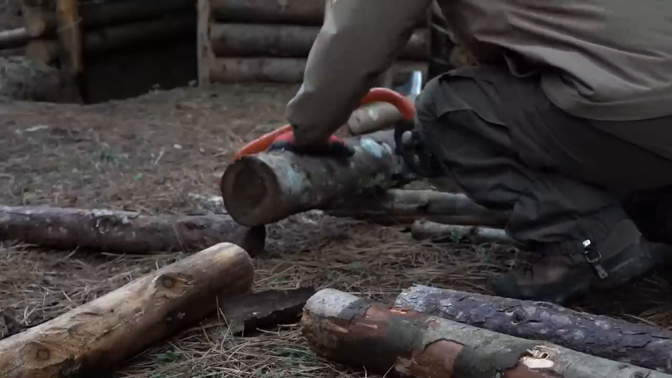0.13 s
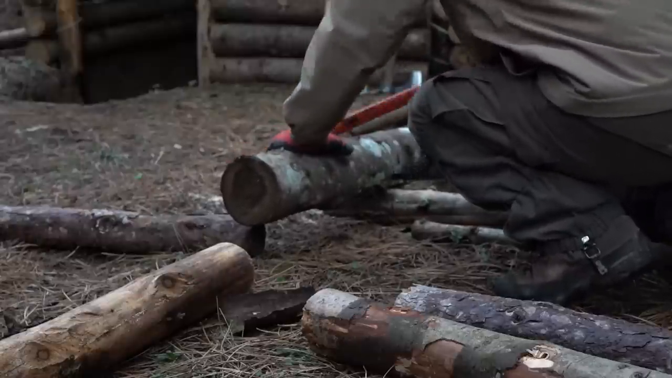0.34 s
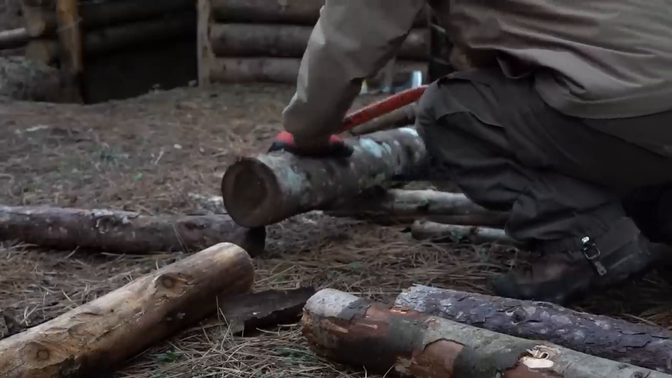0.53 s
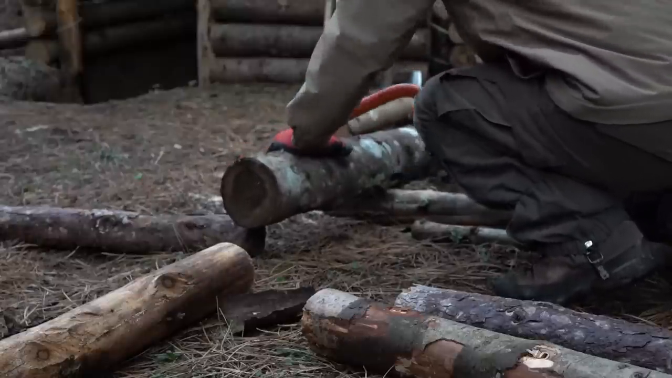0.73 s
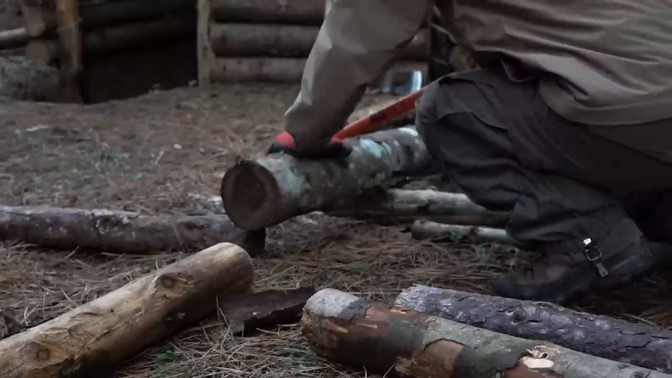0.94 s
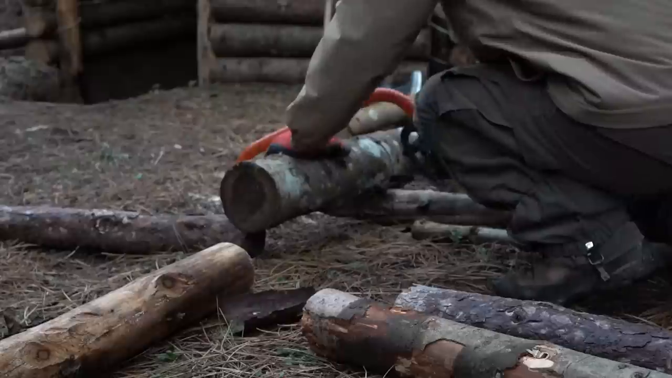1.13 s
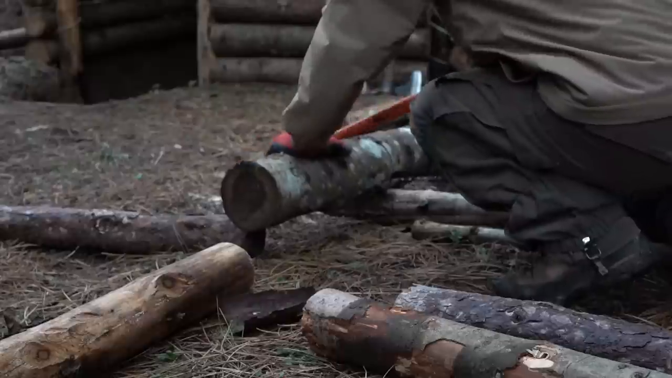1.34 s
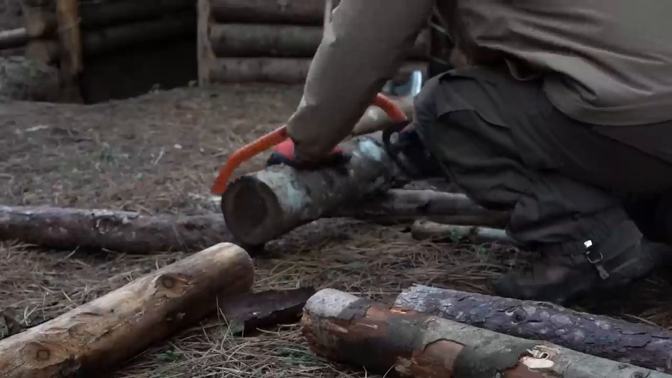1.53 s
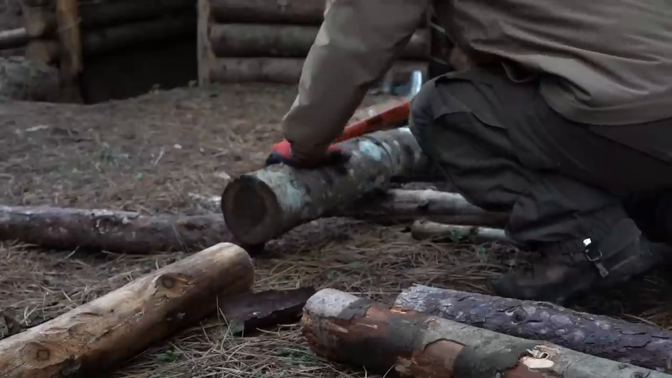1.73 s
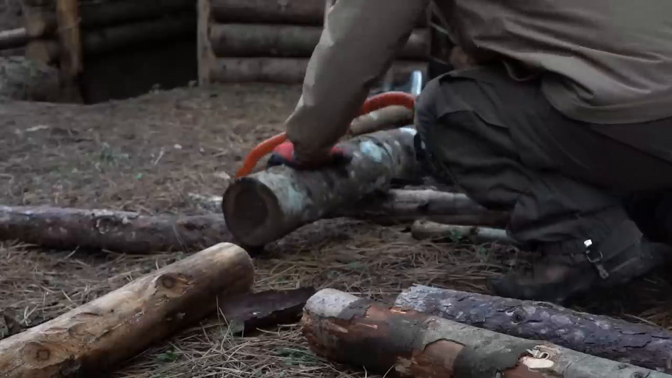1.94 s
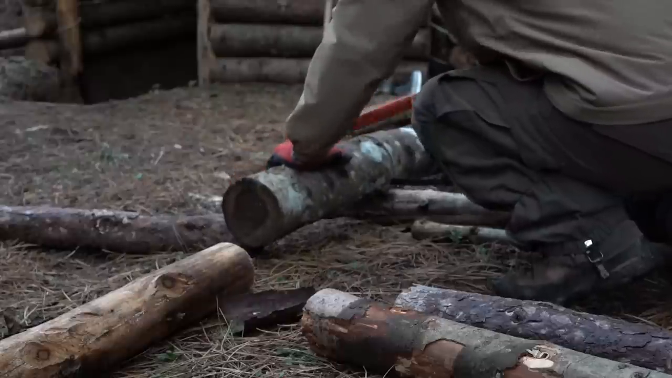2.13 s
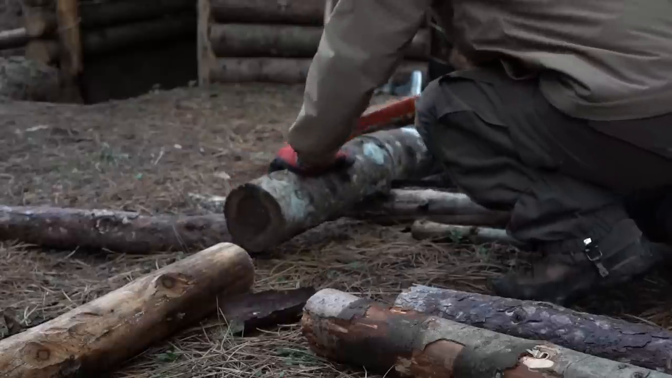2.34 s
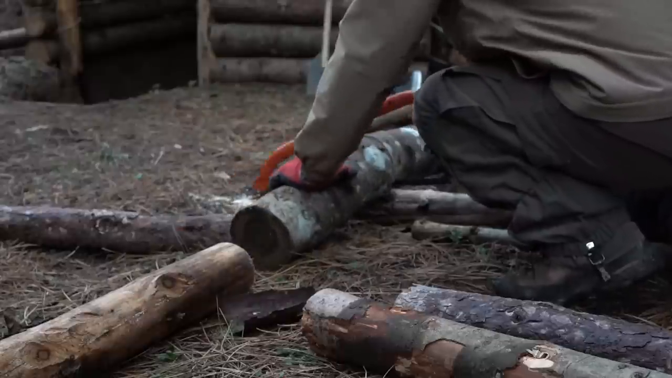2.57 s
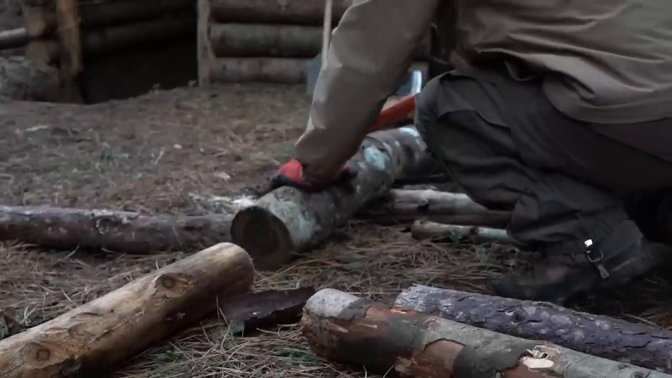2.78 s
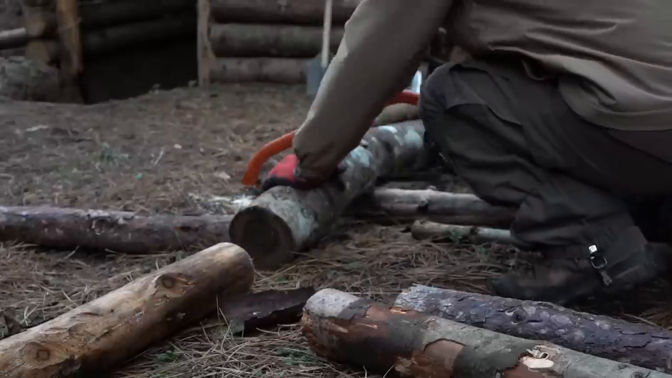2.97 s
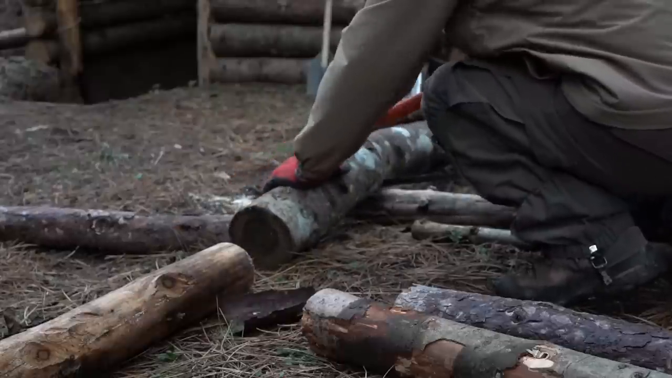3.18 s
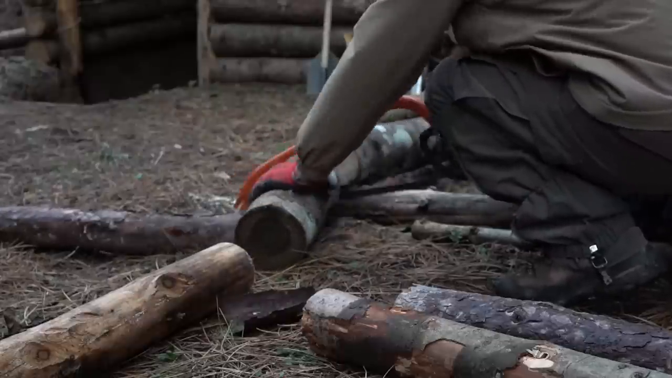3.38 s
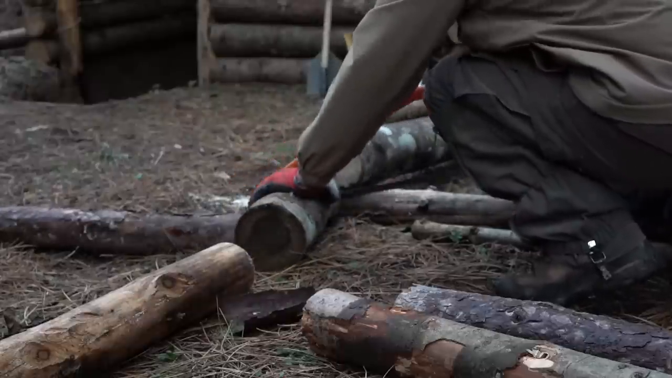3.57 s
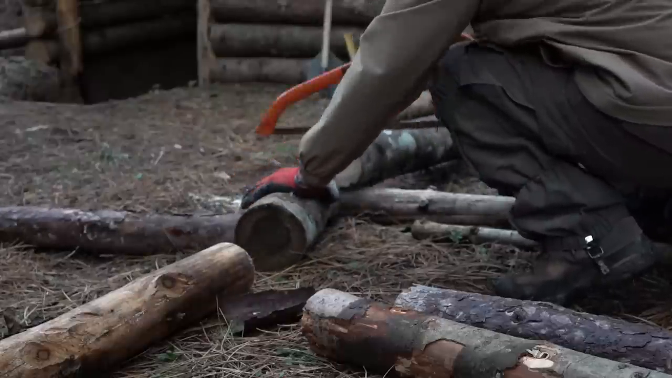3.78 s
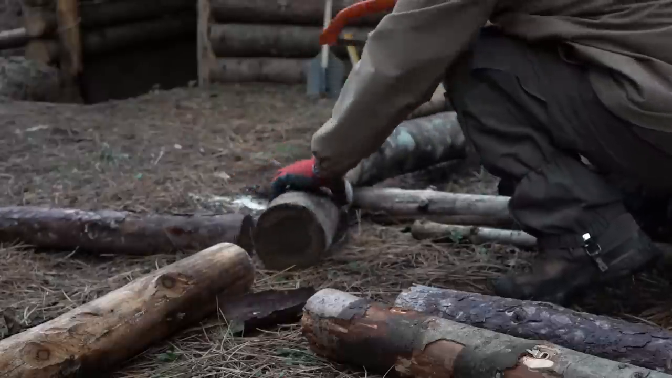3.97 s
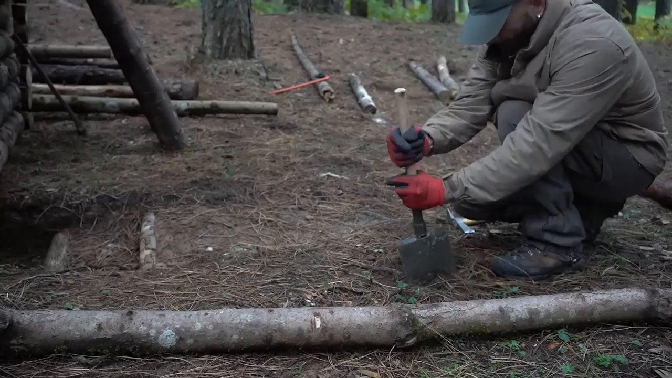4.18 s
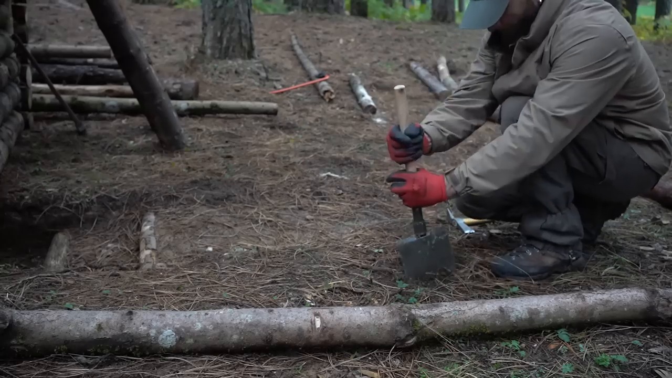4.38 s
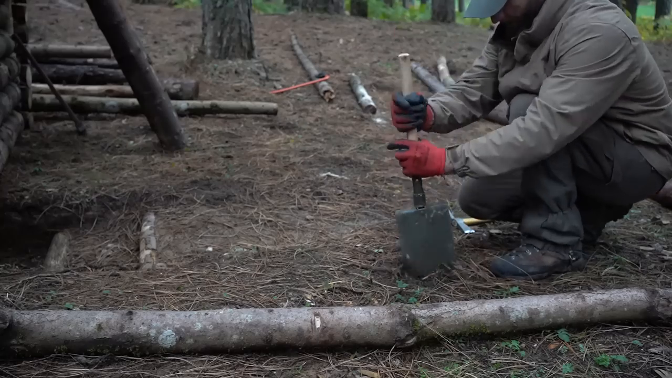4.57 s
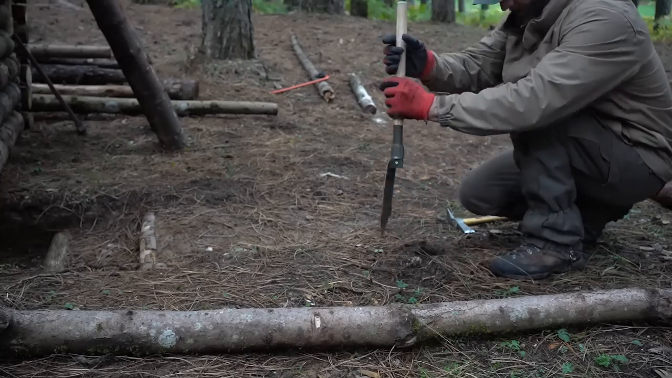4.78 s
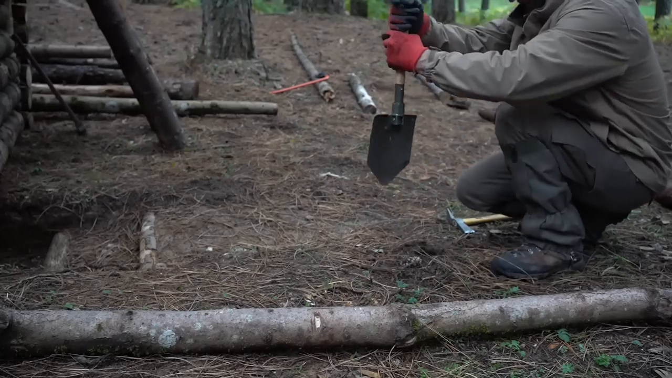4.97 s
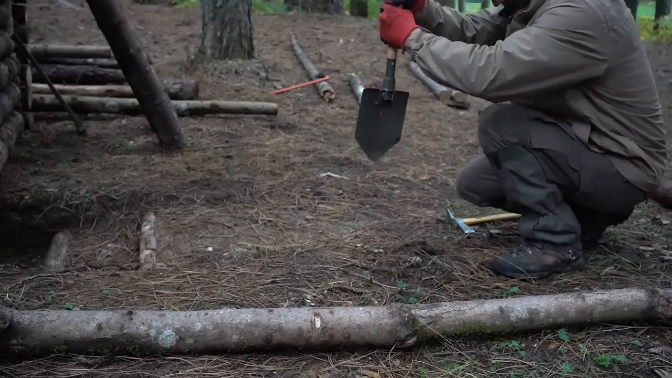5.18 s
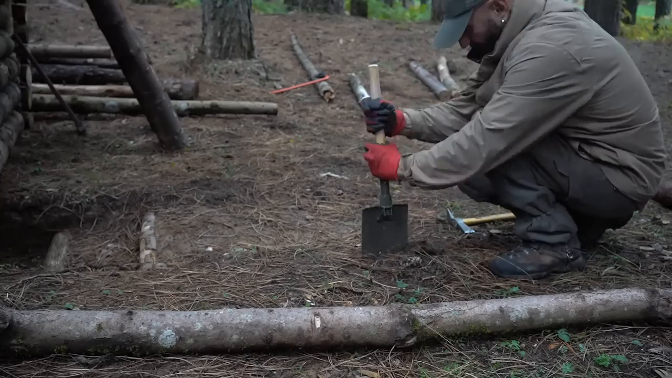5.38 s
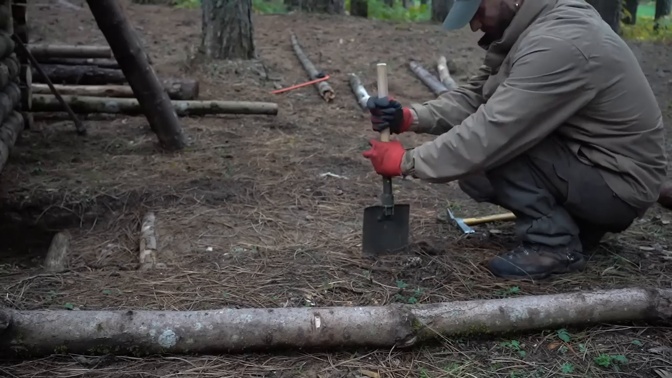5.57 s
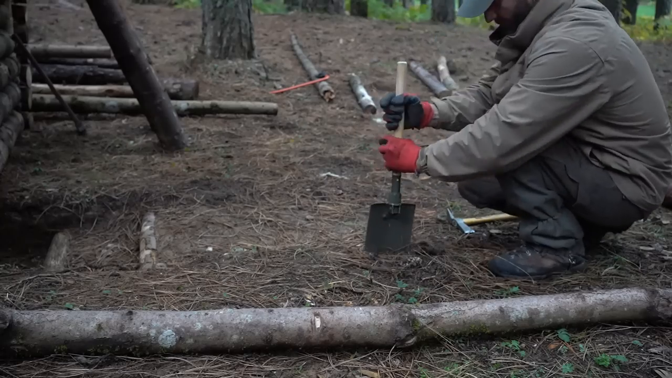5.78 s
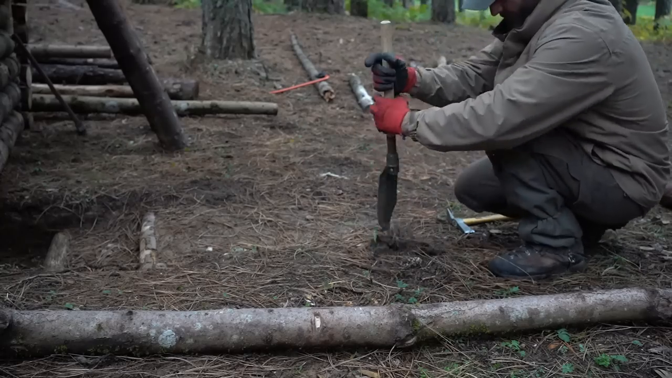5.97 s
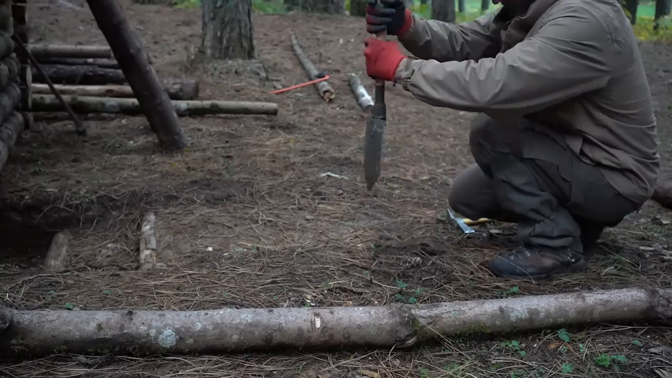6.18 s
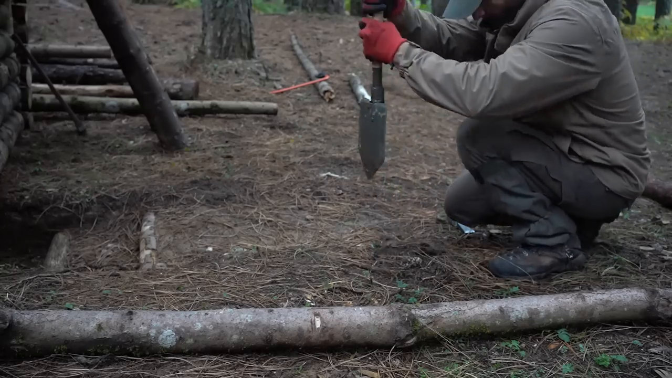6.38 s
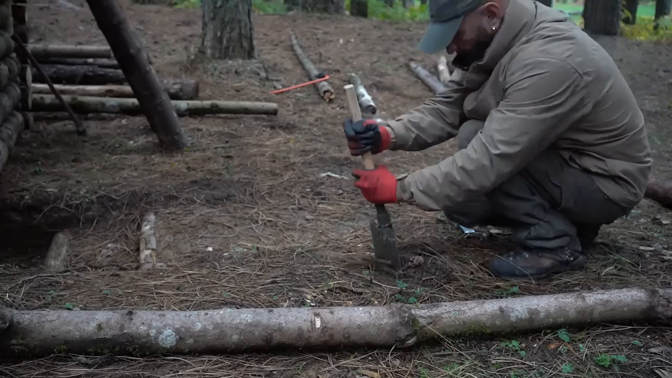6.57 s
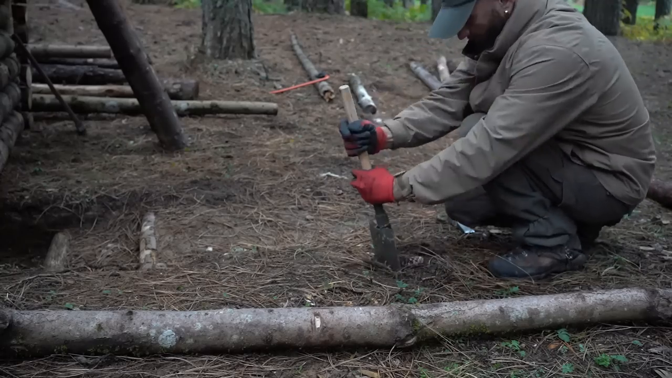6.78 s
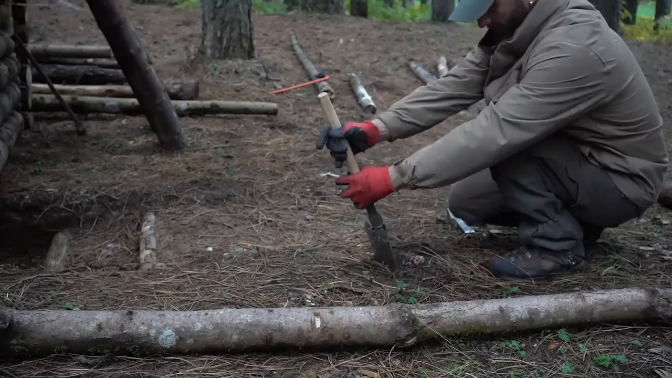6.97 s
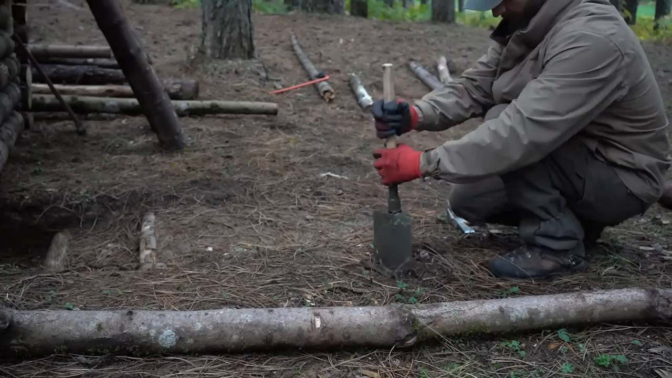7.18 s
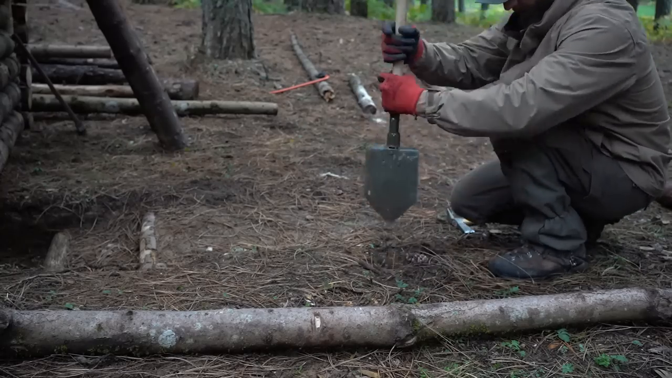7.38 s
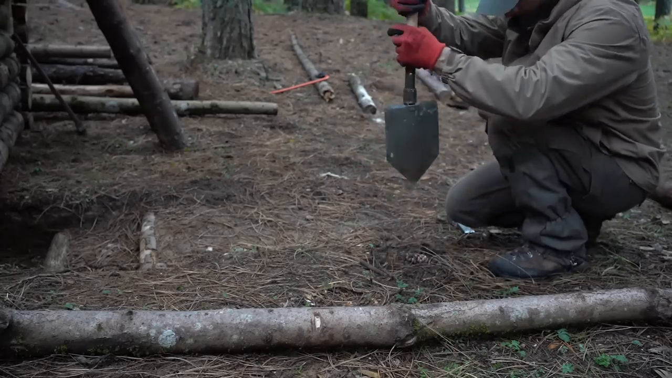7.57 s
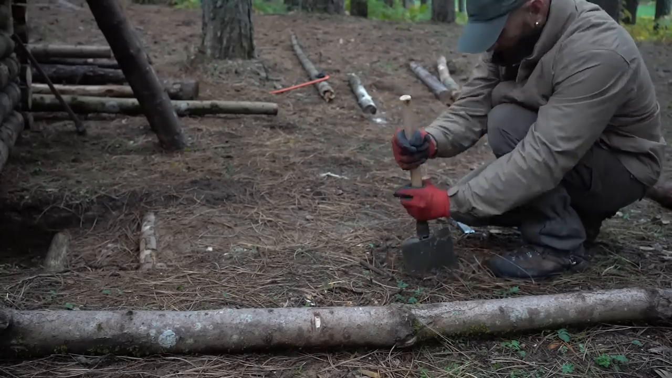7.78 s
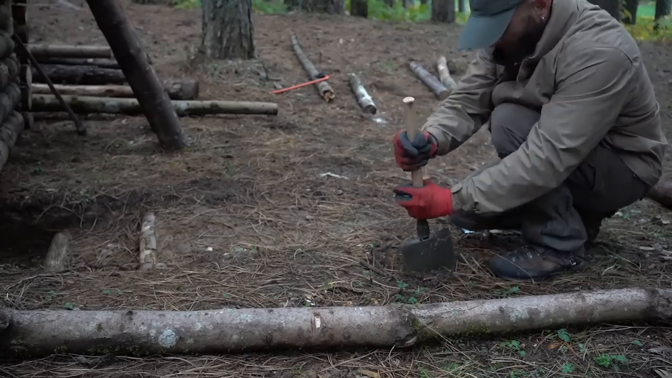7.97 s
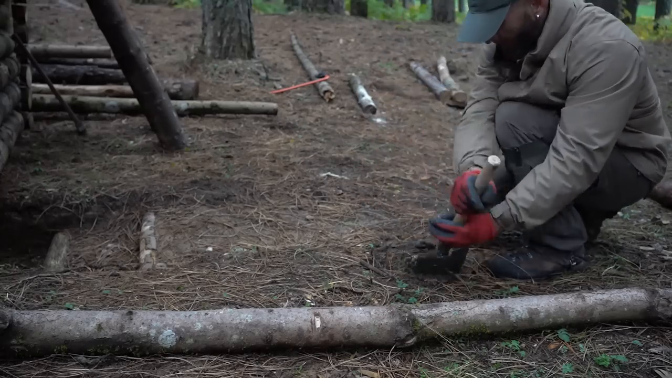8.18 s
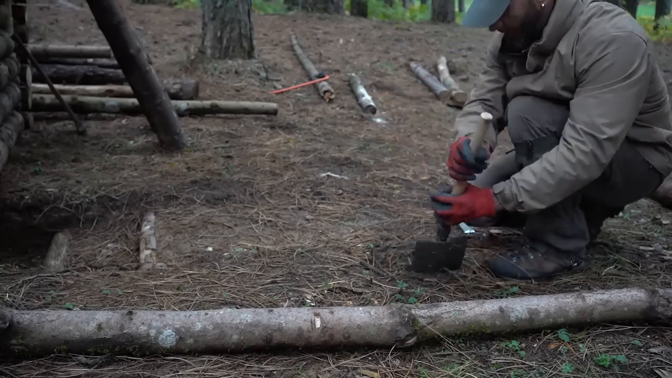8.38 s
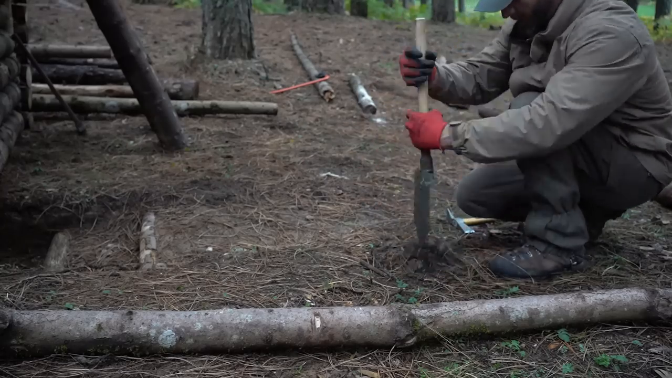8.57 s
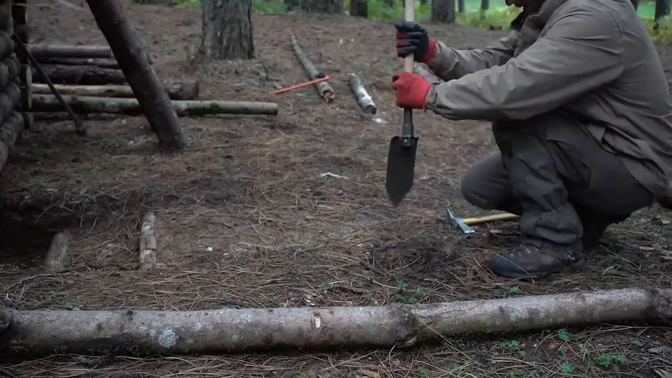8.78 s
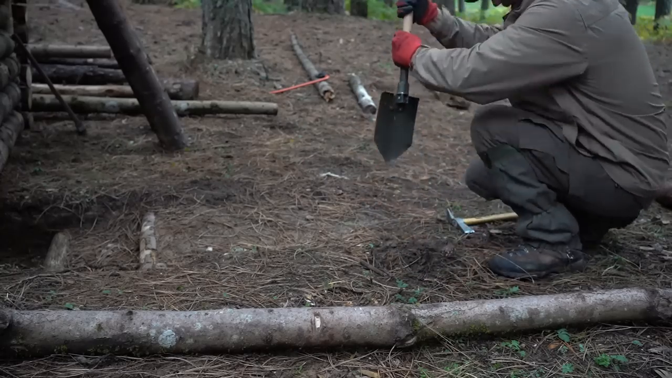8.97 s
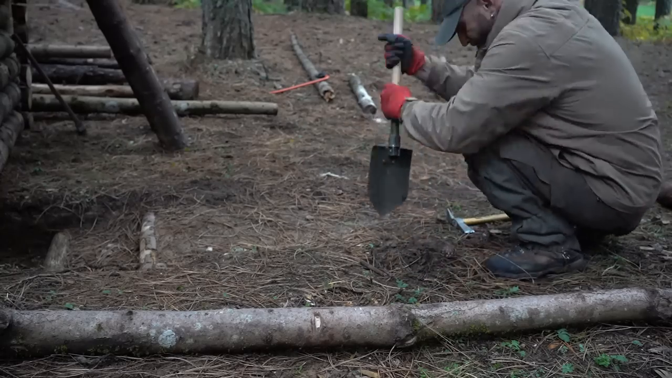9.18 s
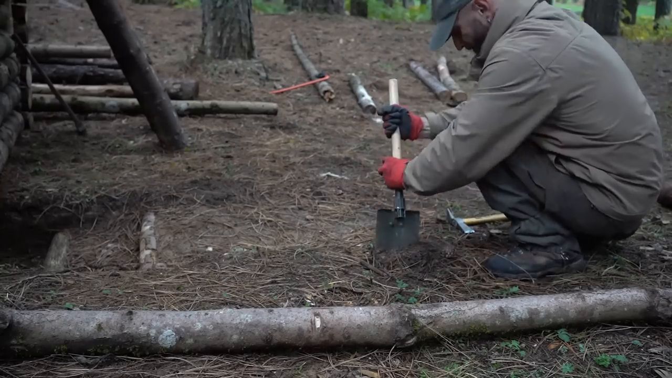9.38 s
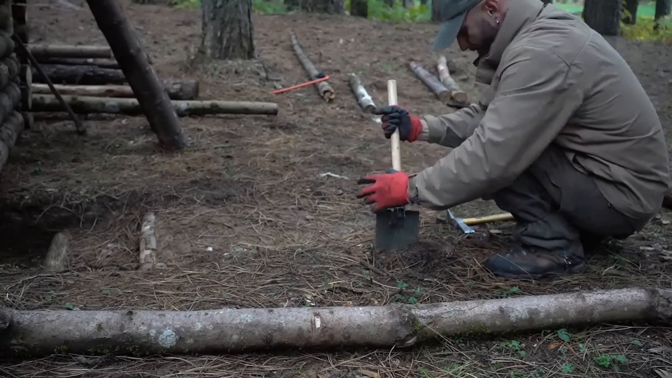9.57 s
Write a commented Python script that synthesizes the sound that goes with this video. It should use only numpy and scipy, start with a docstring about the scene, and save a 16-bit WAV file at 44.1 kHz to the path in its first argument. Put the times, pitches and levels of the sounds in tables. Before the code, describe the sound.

A hand saw rasps quickly through a log until it snaps, then a small shovel stabs five times into forest soil.

```python
"""A bow saw rasps through a log in quick push-and-pull strokes, its teeth tearing fibres that set blade
and wood ringing. The log knocks on its support, the last fibres snap and the blade clinks free.
Then a short steel shovel is stabbed five times into root-filled forest soil, levered and drawn out
ringing between stabs. A jacket flaps with the swings, the soft ground booms, and the trees return
a thin echo over quiet air."""
import sys
import numpy as np
from scipy import signal
from scipy.io import wavfile
from scipy.ndimage import uniform_filter1d

SR = 44100
rng = np.random.default_rng(int(sys.argv[2]) if len(sys.argv) > 2 else 0)


def pcm_store(signal):
    """Save signal as 16-bit PCM."""
    levels = np.round(np.clip(np.atleast_2d(signal), -1, 1) * 32767)
    wavfile.write(sys.argv[1], SR, levels.astype(np.int16).T)


N = 424241
TIME = np.arange(N) / SR
AGE = TIME[:SR * 3 // 4]  # seconds since a hit
LET_GO_S = .011  # release of a saw stroke

# saw strokes, push and pull in turn: t/s, length/s, rasp/dB, crunch/dB, hum/dB, groan/Hz, catch/dB
SAW_STROKES = [(0.005, 0.073, -40, -38.5, -41, 360, -45), (0.0987, 0.14, -18.5, -25.5, -24.5, 339, -13),
               (0.3346, .13, -27, -32, -28.5, 353, -20), (0.568, 0.1, -18, -26, -23, 302, -9),
               (0.803, 0.13, -31, -37, -36.5, 375, -34), (1.0287, 0.11, -21.5, -29, -27, 351, -11),
               (1.25, .13, -31, -36.5, -32.5, 358, -38), (1.468, 0.15, -19, -28.5, -25, 359, -12.5),
               (1.693, .13, -24, -30, -25.5, 300, -16), (1.9168, .13, -18.5, -27, -25, 357, -10.5),
               (2.149, .125, -25.5, -32.5, -31.5, 348.4, -36), (2.35, 0.17, -18.5, -25, -28, 392, -29),
               (2.583, 0.13, -23, -29, -34, 290, -22), (2.81, 0.094, -16.5, -26.5, -32.5, 250, -25),
               (3.064, 0.1, -25, -34.5, -44, 237, -24), (3.262, 0.017, -30.5, -40, -37, 236, -36)]
# spectrum of the rasping teeth: f/Hz, level/dB
RASP_EQ = [(1200, -27.5), (2300, -3.5), (3200, 9), (4500, 11), (6000, 0.5), (8300, 4.5), (9300, -1.5),
           (10500, -9), (12500, 0), (15300, 2.5), (16500, 5)]
# modes of the log: f/Hz, level/dB, t60/s
LOG_MODES = [(98, -21, 0.1), (174, -8.5, 0.087), (221, -10, 0.27), (294, -0.5, 0.081), (354.3, -1, 0.096),
             (419, -2.5, 0.027), (529.4, -5, 0.071), (631, -12.5, 0.12)]
# spectrum of a sharp snap: f/Hz, level/dB
SNAP_EQ = [(150, -7), (400, -7.5), (1500, -4), (4000, 0.5), (8000, -2), (10500, -22), (15000, -5.5)]
# modes of the free saw blade: f/Hz, level/dB, t60/s
BLADE_MODES = [(2326, -11, 0.19), (3230, -11.5, .12), (3720, -9.5, 0.51), (4560, -12, 0.2),
               (4690, -5, 0.36), (4770, -5, 0.28), (4920, -3, 0.35), (5240, 1, 0.13), (6640, -23, 0.11),
               (8100, -9, .17), (12400, -9, .1), (14300, -7, .1), (15200, -9, .06)]
# spectrum of crumbling soil: f/Hz, level/dB
SOIL_EQ = [(700, -8), (1500, 2), (2500, 0.5), (4500, -1.5), (8200, -2.5), (10000, -19), (15000, -13.5)]
# spectrum of the jacket cloth: f/Hz, level/dB
CLOTH_EQ = [(100, -4.5), (300, -2), (550, -2.5), (880, 3), (1150, -4), (1600, -13), (2500, -23.5),
            (6000, -41)]
# shovel stabs: t/s, grit/dB, grit hold/s, roots/dB, roots hold/s, thud/dB, ring/Hz, ring/dB,
# ground boom/dB, sleeve swish/dB
SHOVEL_STABS = [(4.213, -12.5, 0.0074, -12, 0.015, -10, 1692, -21.5, -21.5, -35),
                (5.4298, -12.5, 0.0053, -9, 0.007, -13, 1660, -39, -24.5, -39),
                (6.564, -10.5, 0.016, -11.5, 0.012, -11.5, 966, -17, -24.5, -34.5),
                (7.8215, -20, 0.018, -14, 0.0022, -6, 445, -15, -19.5, -33.5),
                (9.2768, -13.5, 0.0011, -15, 0.024, -16, 1134, -14, -28.5, -33.5)]
# modes of the free shovel: f/Hz, level/dB, t60/s
SHOVEL_MODES = [(917, -7, 0.19), (1500, -13, 0.48), (1580, -8, .14), (1690, -9.5, 0.41), (2060, 0, .1),
                (2516, -10, 0.18), (3200, -11.5, 0.1), (3354, 1.5, .1), (4066, -5, 0.13), (4620, 4.5, 0.08),
                (5450, 4, 0.074), (6220, -12, 0.055), (6740, 0, 0.15), (7420, 1.5, 0.13),
                (8140, 9.5, 0.086), (12000, 2.5, 0.06)]


def gain_of(db):
    """Decibels to gain."""
    return 10 ** (np.asarray(db) / 20)


def evened(x):
    """Scales to rms 1."""
    return x / np.sqrt(np.mean(x ** 2) + 1e-20)


def peaked(x, size=130):
    """Scales the loudest stretch of `size` samples to rms 1."""
    return x / np.sqrt(uniform_filter1d(x ** 2, size).max() + 1e-20)


def read(points, hz):
    """Reads a table on a log-frequency axis."""
    f, value = np.transpose(points)
    return np.interp(np.log(hz + 1), np.log(f + 1), value)


def add(mix, s, sound):
    """Mixes a sound in at time s."""
    part = mix[max(round(s * SR), 0):][:len(sound)]
    part += sound[:len(part)]


def through(x, response):
    """Passes x through an impulse response."""
    return signal.oaconvolve(x, response)[:len(x)]


def colour(x, spectrum, size=4096):
    """Minimum-phase EQ of unit energy."""
    log_gain = np.log(gain_of(read(spectrum, abs(np.fft.fftfreq(size, 1 / SR)))))
    taps = np.fft.ifft(np.exp(signal.hilbert(log_gain).conj())).real[:size // 2]
    return through(x, taps / np.linalg.norm(taps))


def ring(modes):
    """Unit-energy impulse response of damped modes."""
    out = sum(gain_of(db - 60 * AGE / t60) * np.sin(2 * np.pi * hz * AGE + k * k)
              for k, (hz, db, t60) in enumerate(modes))
    return out / np.linalg.norm(out)


def struck(modes, damping=1):
    """Each point of contact favours other modes; damping shortens their ring."""
    return ring([(hz, db + 1.5 * rng.standard_normal(), t60 / damping) for hz, db, t60 in modes])


def body(peaks):
    """Impulse response of broad resonances."""
    return ring([(hz, db + 10 * np.log10(width), np.log(1000) / np.pi / width)
                 for hz, width, db in peaks])


def resonate(x, hz, width_hz):
    """A resonance of gain 1 that follows the curve hz."""
    turn = np.exp(2j * np.pi * np.cumsum(hz) / SR)
    radius = np.exp(-np.pi * width_hz / SR)
    return 2 * (turn * signal.lfilter([1 - radius], [1, -radius], x / turn)).real


def tone(hz, t60):
    """One struck, decaying resonance."""
    attack = 1 - np.exp(-AGE / 0.00015)
    return np.sqrt(2) * np.sin(2 * np.pi * hz * AGE) * gain_of(-60 * AGE / t60) * attack


def wander(hz):
    """Random drift of rms 1, low-passed at hz."""
    return evened(signal.sosfilt(signal.butter(2, hz, fs=SR, output="sos"), rng.standard_normal(N)))


def grains(samples, per_s, spread_db):
    """A random train of small clicks, a few of them large."""
    size = gain_of(spread_db * np.minimum(rng.exponential(1, samples), 4))
    return evened(size * rng.standard_normal(samples) * (rng.random(samples) < per_s / SR))


def burst(rise, hold, fall, linger_db=-60, linger=0.022):
    """A shower of tiny fractures that swells, holds, collapses and lingers; times in seconds."""
    late = np.maximum(AGE - hold, 0)
    decay = np.exp(-late / fall) + gain_of(linger_db) * np.exp(-late / linger)
    return np.minimum(AGE / rise, 1) * decay * grains(len(AGE), 20000, 3.53)


def swell(s, length, rise, fall, arch_db=0, skew=1):
    """Envelope of one movement: a rise up to time s, an arched hold, a release."""
    t = TIME[::16]
    along = np.clip((t - s) / length, 0, 1) ** skew
    outside = np.maximum(s - t, 0) / rise + np.maximum(t - s - length, 0) / fall
    arch = gain_of(-arch_db * (2 * along - 1) ** 2)
    return np.interp(TIME, t, np.exp(-np.minimum(outside, 20)) * arch)


def movements(rows, **shape):
    """One envelope per level column of rows (t/s, length/s, level/dB, ...)."""
    power = sum(gain_of(levels)[:, None] ** 2 * swell(s, length, **shape) ** 2
                for s, length, *levels in rows)
    return np.sqrt(power)


def in_cut(end_s=3.2):
    """Gate that stays open until the teeth leave the wood."""
    return np.exp(-np.clip((TIME - end_s) / LET_GO_S, 0, 20))


def forest_air():
    """A steady, dark bed of air."""
    # spectrum of the air: f/Hz, level/dB
    air_eq = [(20, -2), (45, -1), (100, -4.5), (220, -5), (480, -11), (950, -11), (2500, -17.5),
              (7700, -22.5), (10000, -29), (13500, -25.5), (15800, -31)]
    return colour(rng.standard_normal(N), air_eq)


def steel_rasp(tearing, speed):
    """The teeth set the blade ringing in the cut; a slow blade sounds duller."""
    # resonances of the blade held in the cut: f/Hz, width/Hz, level/dB
    kerf_peaks = [(3310, 480, -17), (3860, 23, -4.5), (4430, 26, -0.5), (4795, 51, 0), (5190, 110, 2.5),
                  (5840, 42, -11.5), (6610, 72, 3), (7170, 65, 5), (8010, 98, -1)]
    # the free length of the blade changes as it travels, so its bending resonances slide
    flex = sum(resonate(tearing, hz * np.exp(.1 * wander(7)), 300) for hz in (3700, 4900, 7400))
    held = through(tearing, body(kerf_peaks))
    bending = evened(colour(flex, RASP_EQ))
    steel = evened(colour(tearing, RASP_EQ) + gain_of(-3.5) * held + gain_of(-6) * bending)
    dull = signal.sosfiltfilt(signal.butter(2, 7000, fs=SR, output="sos"), steel)
    return dull + 1.36 * speed * (steel - dull)


def fibre_crunch(tearing, note_hz=895.4, sag_hz_per_s=17.6):
    """Tearing fibres excite the trunk, one note of which sinks as the cut deepens."""
    # spectrum of tearing fibres: f/Hz, level/dB
    fibre_eq = [(300, -7.5), (650, -8), (1250, 3), (1700, 4), (2600, -4), (3400, -20.5), (7000, -33)]
    # upper resonances of the trunk: f/Hz, width/Hz, level/dB
    trunk_peaks = [(1148, 33, 2.5), (1620, 144, 15.5), (1824, 240, 0), (2395, 25, 7)]
    note = evened(resonate(tearing, note_hz - sag_hz_per_s * TIME, 19))
    return evened(colour(tearing, fibre_eq) + through(tearing, body(trunk_peaks)) + gain_of(-9) * note)


def log_hum(tearing, groan_width_hz=55):
    """The log hums, and teeth passing the fibres groan at a pitch that arches over each stroke."""
    hum_eq = [(100, -12), (210, -3.5), (320, 3), (620, 4), (1500, -11.5), (4000, -42)]
    wood = evened(colour(through(tearing, ring(LOG_MODES)), hum_eq))
    arch = [(s + u * length, hz * (1 - 0.32 * (u - .5) ** 2))
            for s, length, *_, hz, _ in SAW_STROKES for u in np.linspace(0, 1, 5)]
    groan_hz = np.interp(TIME, *np.transpose(arch))
    groan = evened(resonate(resonate(tearing, groan_hz, groan_width_hz), groan_hz, groan_width_hz))
    return evened(wood + gain_of(-1) * groan)


def sawing(top_tooth_hz=420, chatter_db=2.33):
    """Teeth catch and tear fibres, fastest and loudest just past the middle of each stroke."""
    # floor while the blade turns round in the cut: rasp/dB, crunch/dB, hum/dB
    turn_db = (-54, -52, -46)
    strokes = [row[:5] for row in SAW_STROKES]
    biting = movements(strokes, rise=.008, fall=LET_GO_S, arch_db=5.5, skew=1.2)
    # the blade keeps rubbing lightly as it slows down and starts again
    coasting = movements(strokes, rise=.022, fall=.022, arch_db=5.5, skew=1.2)
    rasp, crunch, hum = biting + gain_of(-14) * coasting + gain_of(turn_db)[:, None] * in_cut()
    speed = uniform_filter1d(rasp / rasp.max(), size=2000).clip(1e-4) ** .25
    teeth = 1 + 0.13 * np.cos(2 * np.pi * np.cumsum(top_tooth_hz * speed) / SR)
    tearing = evened(grains(N, 16000, 2.4) * teeth * gain_of(chatter_db * wander(120) + wander(25)))
    out = (gain_of(-1.9) * rasp * steel_rasp(tearing, speed)
           + gain_of(-2.5) * crunch * fibre_crunch(tearing)
           + gain_of(-3) * hum * log_hum(tearing))
    catch_eq = [(1000, -17), (2800, -13), (4000, 0.5), (6000, -2.5), (8000, 1.5),
                (10500, -17), (15000, -9.5)]
    for s, *_, db in SAW_STROKES:
        catch = colour(burst(0.0026, .011, 0.0035), catch_eq)
        add(out, s - .001, gain_of(db - 3) * peaked(catch))
    return out


def wood_knock(response):
    """A blunt blow of about a millisecond rings the wood."""
    blow = np.exp(-AGE / 0.00053) * (1 - np.exp(-AGE / 0.0006))
    return peaked(through(blow, response))


def rocking_log():
    """The log knocks on its support; the ground trembles under the saw and after each knock."""
    # knocks of the log: t/s, knock/dB, ground shake/dB
    knocks = [(.243, -28, -34.5), (0.451, -12.5, -39), (.904, -18, -48), (1.614, -31, -36.5),
              (1.812, -20.5, -39), (1.960, -27.5, -66), (2.277, -26, -58), (2.404, -24, -52),
              (2.505, -23.5, -33.5), (2.703, -14, -34), (2.93, -29, -41), (3.174, -27, -46),
              (3.309, -22.5, -39), (3.50, -35.5, -37.5), (3.575, -43, -54)]
    out = np.zeros(N)
    for s, db, _ in knocks:
        add(out, s, gain_of(db - 1) * wood_knock(struck(LOG_MODES)))
    jolts, = movements([(s, .01, db) for s, _, db in knocks], rise=.012, fall=0.14)
    shake = np.hypot(jolts, gain_of(-51.5) * in_cut())
    rumble_eq = [(15, -12), (30, -14), (48, 8), (65, -11), (88, -5.5), (130, -13),
                 (400, -22), (2000, -117)]
    return out + gain_of(2.8) * shake * colour(rng.standard_normal(N), rumble_eq)


def snapping_fibres():
    """Fibres crack until the cut piece breaks off and rings freely."""
    # fibre snaps: t/s, level/dB
    snaps = [(1.5302, -19), (1.5762, -8.5), (1.8281, -14), (2.4053, -2), (2.5035, -7), (2.9505, -5),
             (3.3082, -12), (3.3116, -0.5), (3.3224, 1)]
    # modes of the cut piece: f/Hz, level/dB, t60/s
    piece_modes = [(183, -8.5, 0.13), (220.8, 3.5, 0.3), (290, -6, 0.072), (407, -10, 0.41),
                   (598, -8, 0.38), (865, 4, 0.14), (1000, -11, 0.18)]
    out = np.zeros(N)
    for s, db in snaps:
        crack = burst(0.00014, 0.0012, 0.00029, -19, .014)
        wood = through(crack, struck(piece_modes))
        add(out, s, gain_of(db) * peaked(colour(crack, SNAP_EQ) + gain_of(-17) * wood))
    add(out, 3.323, gain_of(-23) * wood_knock(ring(piece_modes)))
    return out


def blade_clinks():
    """The freed saw blade taps the wood and rings."""
    # taps of the blade: t/s, level/dB
    clinks = [(3.0637, -18), (3.4646, -6.5), (3.5356, -18.5), (3.7359, -33)]
    out = np.zeros(N)
    for s, db in clinks:
        hit = burst(0.0013, 0.001, 0.0029, -6, 0.013)
        click = colour(hit, RASP_EQ) + colour(hit, SNAP_EQ)
        add(out, s, gain_of(db) * peaked(click + gain_of(-7.5) * through(hit, ring(BLADE_MODES))))
    return out


def blade_slides():
    """The flat of the blade rubs along the bark and shimmers."""
    # slides out of the cut: t/s, length/s, level/dB
    slides = [(3.345, 0.063, -40), (3.475, 0.054, -38.5), (3.738, 0.047, -37.5)]
    rub, = movements(slides, rise=0.0052, fall=0.07)
    contact = grains(N, 7000, 3.6)
    hiss_eq = [(900, 0), (1900, -2), (3500, 4), (7500, -6), (10500, -17), (12500, -10), (14500, -6)]
    shimmer = through(contact, ring(BLADE_MODES))
    return rub * evened(colour(contact, hiss_eq) + gain_of(-6) * shimmer)


def crumbling_soil(clump_db=2.5, hollow_hz=1600):
    """Crumbs of each size sound in their own band and come in their own clumps."""
    # band edges of the crumb sizes: f/Hz
    crumb_edges = (100, 1100, 2000, 3600, 6500, 18000)
    crumbs = np.zeros(N)
    for edges in zip(crumb_edges, crumb_edges[1:]):
        band = signal.butter(2, edges, "bandpass", fs=SR, output="sos")
        crumbs += signal.sosfilt(band, grains(N, 2500, 1.9) * gain_of(clump_db * wander(25)))
    # the gap between blade and soil opens and closes, giving a shifting hollow note
    hollow = evened(resonate(crumbs, hollow_hz * np.exp(0.3 * wander(5.6)), 380))
    return evened(evened(colour(crumbs, SOIL_EQ)) + gain_of(-5) * hollow)


def rustling():
    """Soil crumbles and cloth rubs with each move; sleeves swish and hiss as the shovel comes down."""
    # the shovel is levered or the body shifts: t/s, length/s, soil/dB, cloth/dB
    shifts = [(3.65, 0.059, -48, -64), (3.95, 0.059, -50.5, -59), (4.03, 0.031, -42, -50),
              (4.66, 0.29, -47, -54), (4.96, 0.066, -52, -51), (5.67, 0.08, -46.5, -59),
              (5.787, 0.027, -42, -54), (5.86, 0.042, -45.5, -59), (6.1, 0.23, -50.5, -54.5),
              (6.872, 0.093, -39.5, -42.5), (7.035, 0.071, -42, -49), (7.135, 0.081, -43, -46.5),
              (7.42, .07, -46, -51), (8.125, 0.18, -38.5, -43.5), (8.34, 0.1, -45, -46.5),
              (8.49, 0.22, -45, -48), (8.7, 0.39, -57, -53)]
    soil = crumbling_soil()
    cloth = evened(colour(grains(N, 800, 1.35) * gain_of(2 * wander(40)), CLOTH_EQ))
    crumbling, rubbing = movements(shifts, rise=0.02, fall=0.011, arch_db=2)
    swish = sum(gain_of(db) * swell(s - .01, .01, rise=0.045, fall=.005) for s, *_, db in SHOVEL_STABS)
    return (crumbling + gain_of(-7) * swish) * soil + (rubbing + swish) * cloth


def one_shots(cues, spectrum, *shape):
    """A fresh, coloured burst at each cue (t/s, level/dB)."""
    out = np.zeros(N)
    for s, db in cues:
        add(out, s, gain_of(db) * peaked(colour(burst(*shape), spectrum)))
    return out


def twig_cracks():
    """Twigs crack in the soil."""
    # cracks: t/s, level/dB
    twigs = [(3.9793, -31), (4.927, -17.5), (5.505, -24), (5.7902, -30), (6.2423, -28), (6.8781, -22.5),
             (7.097, -24), (7.422, -30.5), (8.316, -24), (8.3738, -17.5), (8.672, -28.5), (8.833, -35.5),
             (9.1682, -26.5), (9.332, -20)]
    return gain_of(-7.5) * one_shots(twigs, SOIL_EQ, 0.00013, 0.0015, 0.0022, -15.5, 0.033)


def jacket_flaps():
    """The jacket flaps in short, soft pats."""
    # flaps: t/s, level/dB
    flaps = [(4.099, -36), (4.125, -29.5), (4.904, -36), (5.349, -27.5), (5.364, -28), (5.397, -22.5),
             (6.206, -39), (6.245, -32.5), (6.492, -38), (6.515, -36), (6.875, -31.5), (7.093, -32),
             (8.175, -27.5), (8.505, -30), (9.01, -39), (9.234, -34)]
    return one_shots(flaps, CLOTH_EQ, 0.00065, 0.0021, 0.0019, -19, 0.012)


def soil_lead_in(mix, s, db, crumbs):
    """Mixes in 50 ms of reversed soil noise that swells up to time s."""
    add(mix, s - 0.05, gain_of(db) * peaked(colour(crumbs, SOIL_EQ)[:SR // 20][::-1]))


def shovel_stabs():
    """Each stab hisses through grit, tears roots and thuds; the soil damps the ringing steel."""
    # spectrum of grit on steel: f/Hz, level/dB
    grit_eq = [(1500, -18), (3300, 0), (5000, -3), (8200, -1), (9800, -17), (12500, -11), (15500, -11)]
    # spectrum of tearing roots: f/Hz, level/dB
    root_eq = [(300, -12), (600, -12), (900, 0), (1250, -3.5), (1650, 0), (2500, -6), (4000, -14.5),
               (9000, -46)]
    # spectrum of thudding earth: f/Hz, level/dB
    thud_eq = [(30, -27), (85, 0), (165, -2.5), (290, -1.5), (460, -3.5), (700, -6), (1300, -21),
               (4000, -70)]
    # clods give way: t/s, level/dB
    clods = [(4.233, -26), (5.444, -22), (7.061, -37.5), (7.176, -36.5), (7.842, -21), (7.856, -19),
             (9.304, -18)]
    out = one_shots(clods, thud_eq, 0.00041, 0.0054, 0.0053)
    for s, grit_db, grit_s, roots_db, roots_s, thud_db, ring_hz, ring_db, *_ in SHOVEL_STABS:
        soil_lead_in(out, s, -34.5, burst(.001, .002, 0.0095))  # the tip brushes the needle litter
        grit = burst(0.00098, grit_s, 0.0018, -5.5, 0.018)
        buried_steel = through(grit, struck(SHOVEL_MODES, damping=1.8))
        roots = colour(burst(0.0039, roots_s, 0.0008, -8, 0.023), root_eq)
        thud = colour(burst(0.0035, 0.0033, 0.0044, -6.5, 0.02), thud_eq)
        add(out, s, gain_of(grit_db) * peaked(colour(grit, grit_eq) + gain_of(-15) * buried_steel))
        add(out, s + 0.00105, gain_of(roots_db) * peaked(roots))
        add(out, s + 0.00097, gain_of(thud_db) * peaked(thud))
        add(out, s + 0.00298, gain_of(ring_db) * tone(ring_hz, t60=0.095))
    return out


def ground_booms(hz=42, sag_hz=12, travel_s=0.0442, echo_s=0.13):
    """Each stab sends a slow wave through springy soil: it arrives late, sinks in pitch, returns once."""
    phase = 2 * np.pi * np.cumsum(hz + sag_hz * np.exp(-AGE / 0.014)) / SR
    first = np.exp(-(AGE / 0.047) ** 2)
    echo = gain_of(-14) * np.exp(-((AGE - echo_s) / 0.015) ** 2)
    tail = gain_of(-13.5) * np.exp(-AGE / 0.15)
    wave = gain_of(-14.5) * np.sin(2 * phase) * first - np.sin(phase) * (first + echo + tail)
    boom = peaked(wave * (1 - np.exp(-AGE / 0.011)), size=1000)
    out = np.zeros(N)
    for s, *_, boom_db, _ in SHOVEL_STABS:
        add(out, s + travel_s, gain_of(boom_db) * boom)
    return out


def shovel_draws():
    """The shovel slides up through loose soil, scrapes clear of the hole and rings."""
    # draws: t/s, scrape/dB, scrape hold/s, ring/Hz, ring/dB, ring t60/s
    draws = [(4.5762, -19.5, .018, 1117, -20, 0.046), (5.9294, -17, 0.0073, 1496, -37, 0.26),
             (7.2338, -18, 0.01, 3350, -27, 0.12), (8.3616, -27, .016, 1690, -37, 0.22)]
    out = np.zeros(N)
    for s, db, hold, ring_hz, ring_db, t60 in draws:
        soil_lead_in(out, s, db - 14, burst(0.00063, 0.0021, 0.012))
        scrape = burst(0.00054, hold, 0.003, -15, 0.01)
        steel = through(scrape, struck(SHOVEL_MODES, damping=1.7))
        add(out, s, gain_of(db) * peaked(colour(scrape, SOIL_EQ) + gain_of(-2.5) * steel))
        add(out, s + 0.00287, gain_of(ring_db) * tone(ring_hz, t60))
    return out


def stone_ticks():
    """Steel on stone gives a hard tick with a very short ring."""
    # stone strikes: t/s, level/dB, ring/Hz
    stones = [(9.2749, -3, 7950), (5.4326, -16.5, 3100)]
    tick_eq = [(2000, 0), (7000, 1), (9000, 4.5), (15000, -4.5)]
    out = np.zeros(N)
    for s, db, hz in stones:
        tick = colour(burst(0.00046, .002, 0.00066), tick_eq)
        add(out, s, gain_of(db) * peaked(tone(hz, t60=0.023) + tick))
    return out


def forest_echo(x):
    """Sparse echoes from trunks, each band dying at its own speed."""
    # decay among the trees: f/Hz, t60/s
    decay_times = [(100, 0.68), (500, 0.3), (2000, 0.57), (7000, 0.55), (15000, 0.27)]
    taps = rng.standard_normal(SR) * (rng.random(SR) < 2500 / SR) * np.minimum(TIME[:SR] / 0.0017, 1)
    hz, t, bands = signal.stft(taps, SR, nperseg=256)
    decay = gain_of(-60 * t / read(decay_times, hz)[:, None])
    tail = signal.istft(bands * decay, SR, nperseg=256)[1]
    return through(x, tail / np.linalg.norm(tail))


def scene():
    """Sawing, then digging, among quiet trees; mono."""
    saw = sawing() + rocking_log() + snapping_fibres() + blade_clinks() + blade_slides()
    foley = rustling() + twig_cracks() + jacket_flaps()
    shovel = shovel_stabs() + ground_booms() + shovel_draws() + stone_ticks()
    work = saw + foley + shovel
    return (work + gain_of(-50.5) * forest_air() + gain_of(-18.5) * forest_echo(work))[None]


def record(dry):
    """The hardest blows clip, then a steep low-pass trims the top."""
    low_pass = signal.firwin(511, 15900, window=("kaiser", 9), fs=SR)
    return signal.oaconvolve(np.clip(dry, -1, 1), low_pass[None], "same")


dry = scene()
out = record(dry)
pcm_store(out)
```